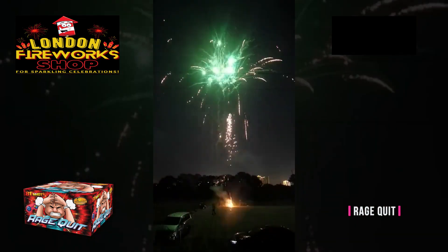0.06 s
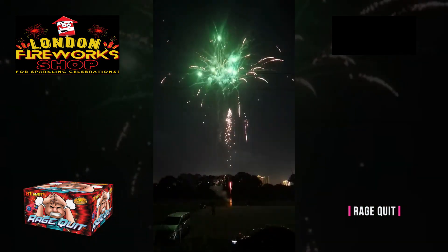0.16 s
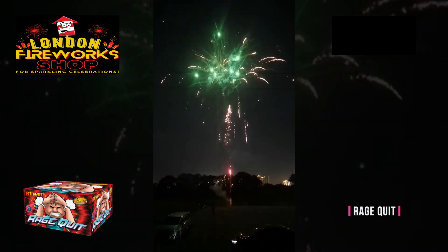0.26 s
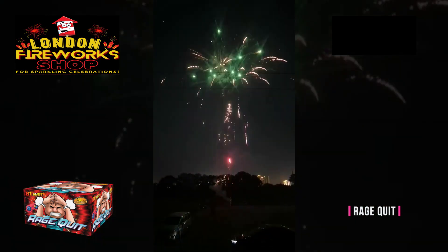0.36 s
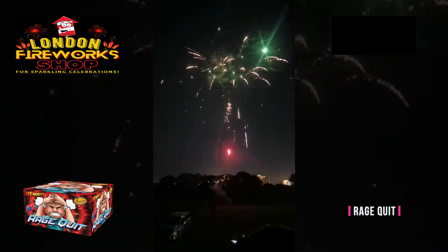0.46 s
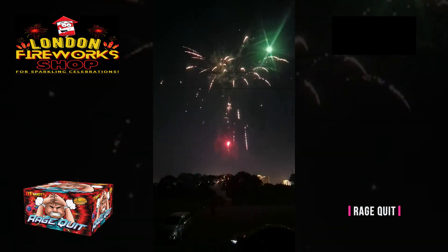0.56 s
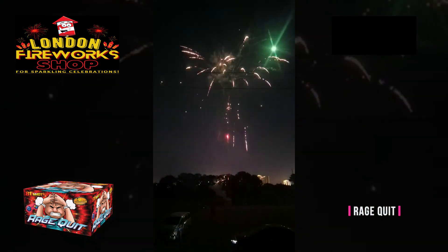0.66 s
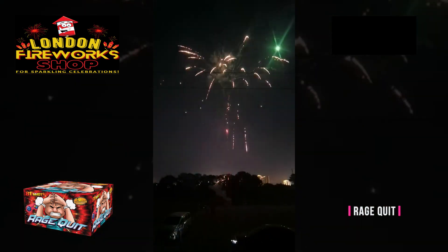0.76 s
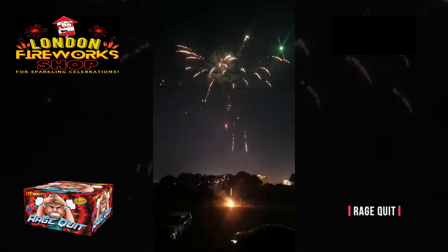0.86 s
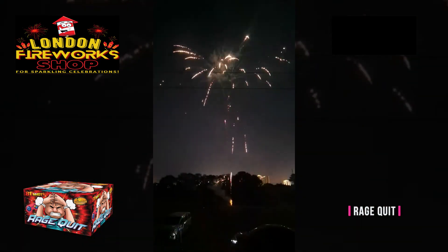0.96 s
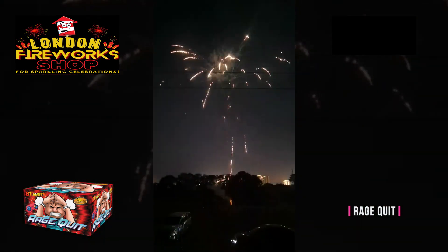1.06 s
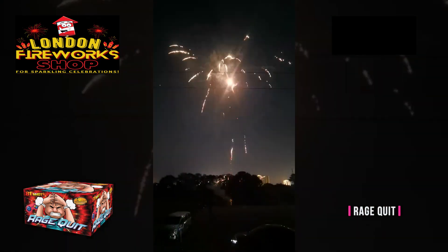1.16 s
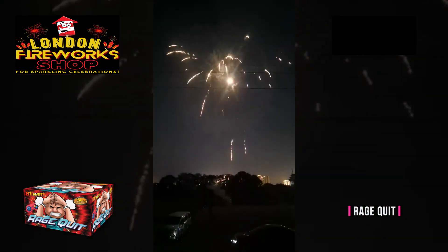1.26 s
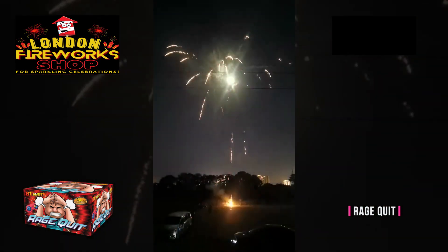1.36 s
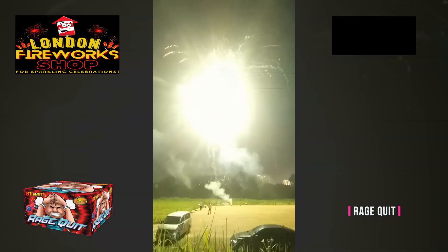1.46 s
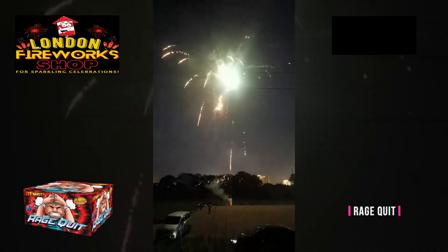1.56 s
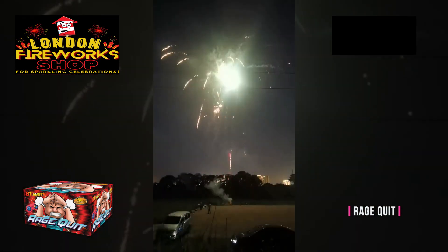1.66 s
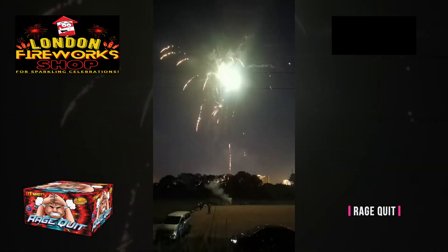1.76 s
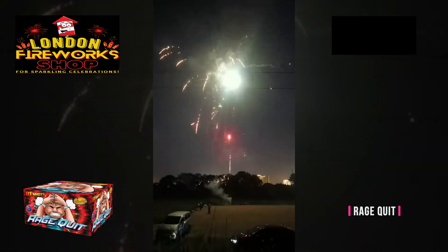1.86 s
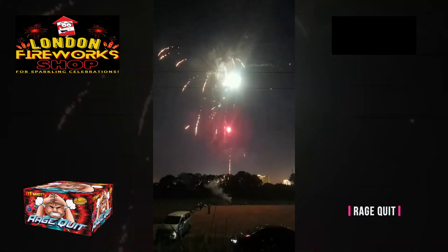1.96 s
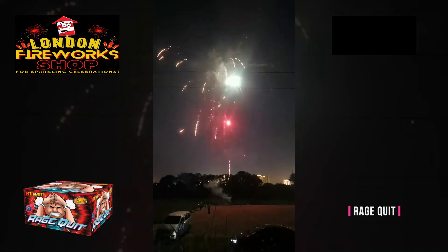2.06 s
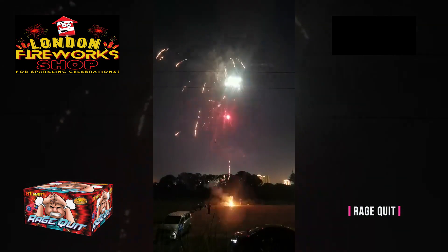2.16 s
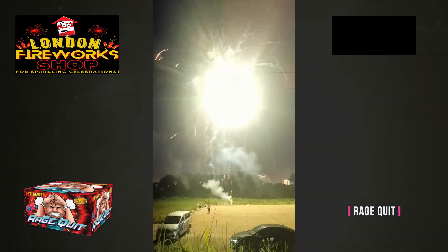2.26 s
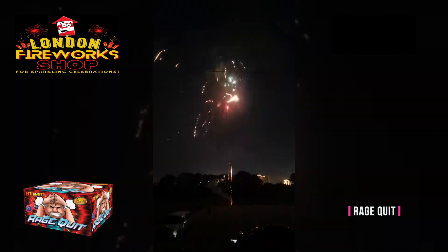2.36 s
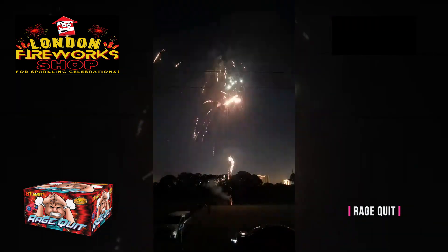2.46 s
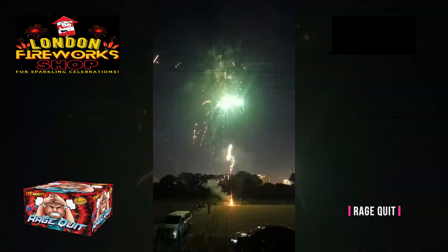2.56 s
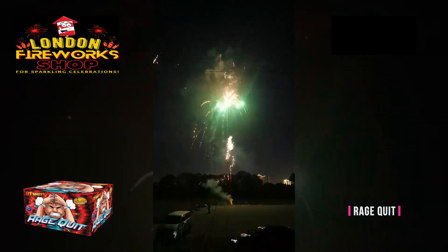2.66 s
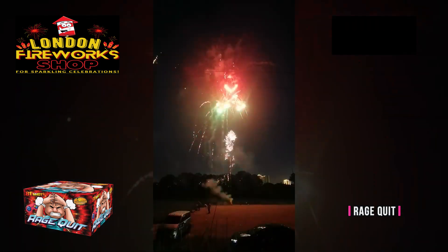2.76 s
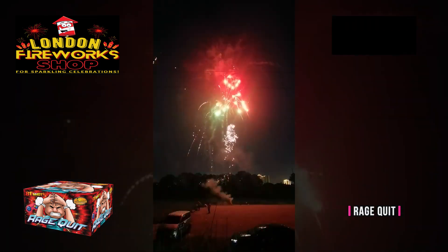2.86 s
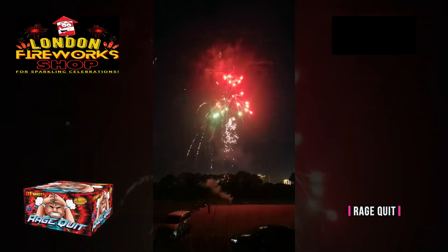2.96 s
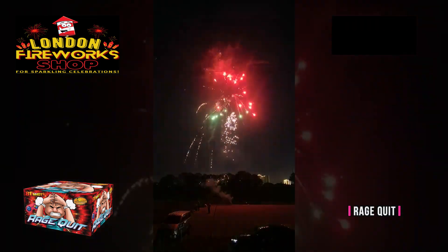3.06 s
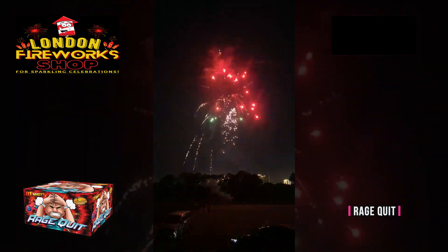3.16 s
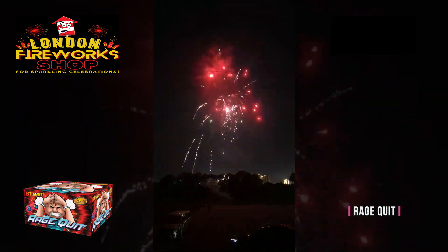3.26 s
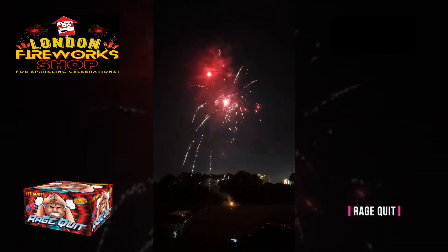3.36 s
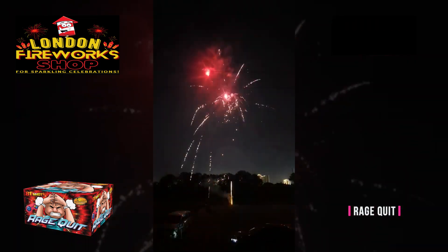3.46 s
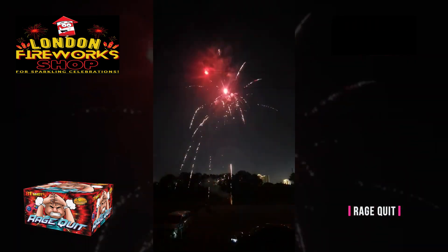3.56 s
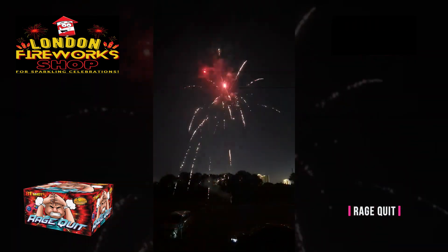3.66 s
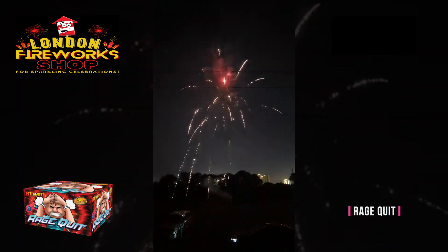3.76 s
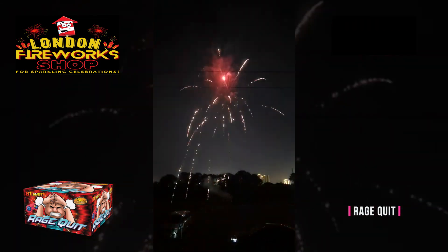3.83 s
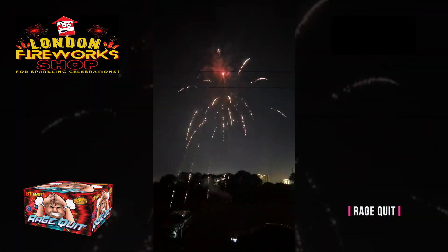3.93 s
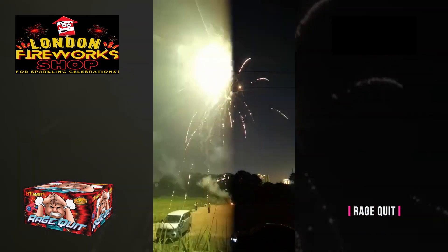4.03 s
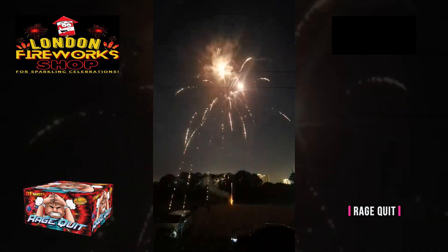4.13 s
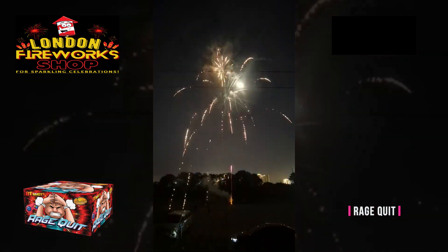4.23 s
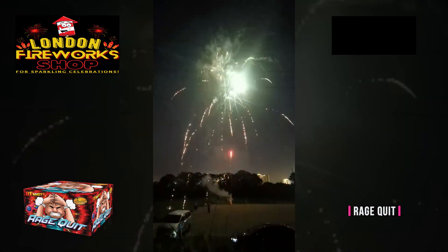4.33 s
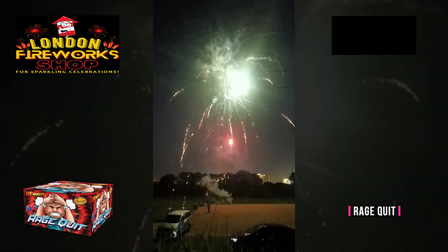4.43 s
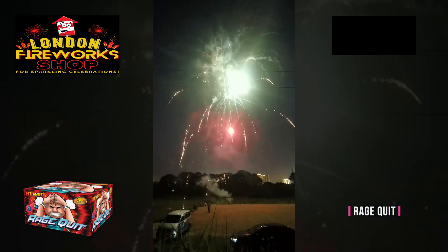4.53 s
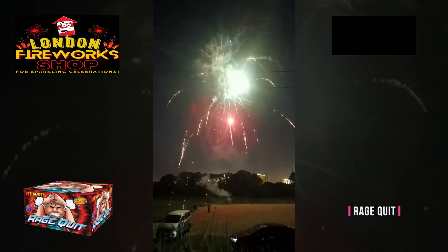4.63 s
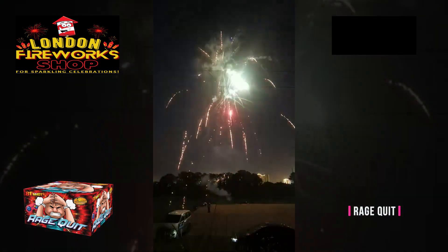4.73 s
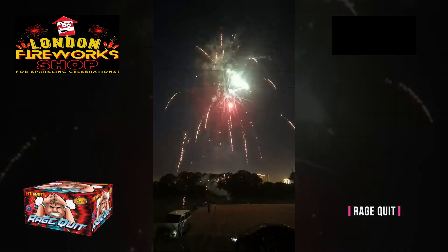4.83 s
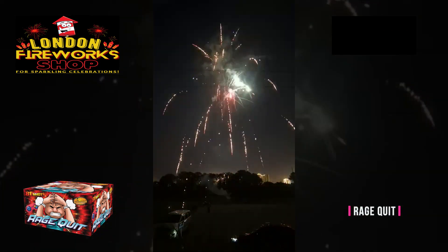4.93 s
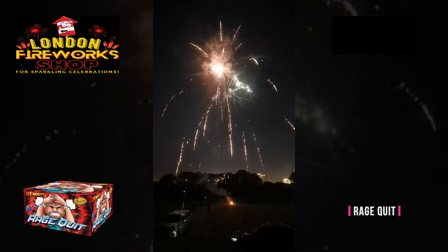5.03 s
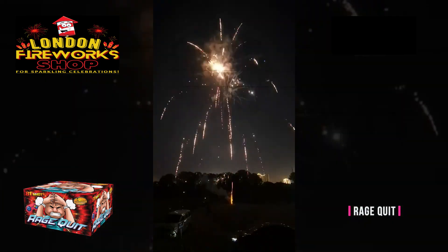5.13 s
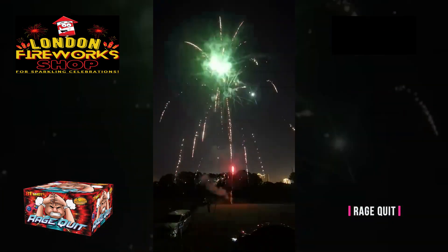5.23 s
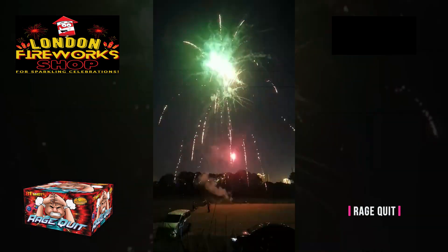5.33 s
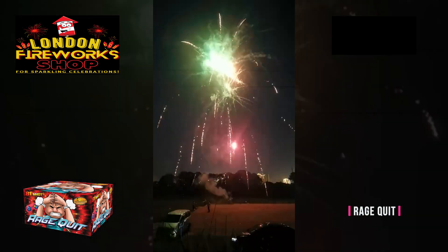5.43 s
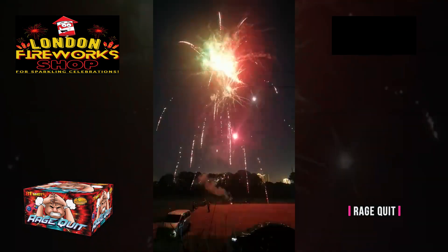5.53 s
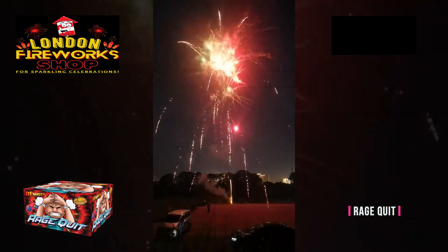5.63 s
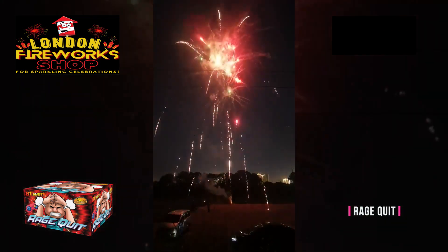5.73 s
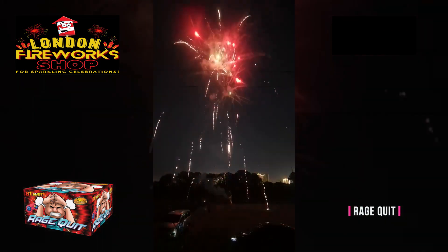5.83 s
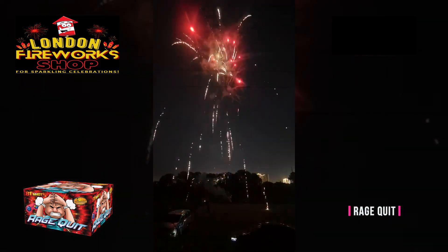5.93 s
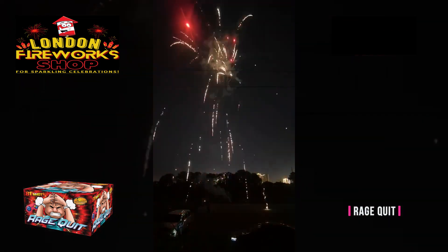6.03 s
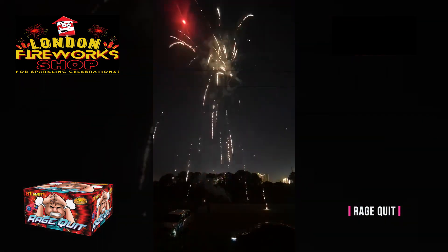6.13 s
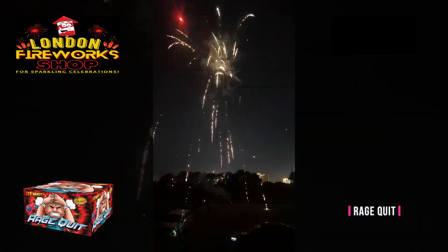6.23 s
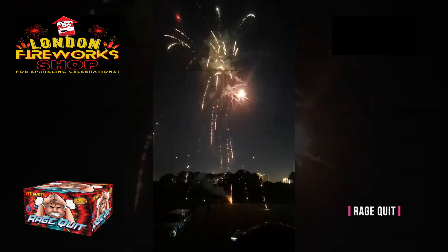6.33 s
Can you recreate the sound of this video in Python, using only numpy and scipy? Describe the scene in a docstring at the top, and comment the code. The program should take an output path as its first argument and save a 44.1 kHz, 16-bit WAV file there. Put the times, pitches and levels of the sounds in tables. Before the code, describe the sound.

A multi-shot firework fires on an open night field, heard from beside a parked car. Hard lift cracks at the ground alternate irregularly with deep overhead booms. Each burst leaves bright hiss, fine crackle and a short lumpy roll; a nearby wall and fences throw back quick slaps. The loudest peaks squash, and wide stereo hiss sits over faint rumble.

```python
"""Booms burst overhead, stars hiss and crackle after them, and lift charges crack at ground level: a firework
cake on an open field at night, heard from beside a parked car. Bangs are pressure pulses plus short treble
bursts; stars, comets and rolling echoes are shaped stereo noise. The ground, the car, a near wall, fences
and a far row of houses answer with delayed copies, over a distant rumble and thin hiss.
The loudest peaks are squashed at full scale."""
import sys
import numpy as np
from scipy import signal
from scipy.fft import rfft, irfft, next_fast_len
from scipy.io import wavfile
from scipy.ndimage import uniform_filter1d, map_coordinates

SR = 44100
rng = np.random.default_rng(int(sys.argv[2]) if len(sys.argv) > 2 else 0)


def waveform_to_disk(signal):
    """Save audio, clipped to [-1, 1], as 16-bit WAV at the path in sys.argv[1]."""
    frames = np.transpose(np.atleast_2d(signal))
    scaled = np.clip(frames, -1, 1) * 32767
    samples = np.round(scaled).astype(np.int16)
    wavfile.write(sys.argv[1], SR, samples)


N = 281799
T = np.arange(SR) / SR  # one second of time, s
LIFT_WALL_S = .0341  # delay of the near wall's answer to a sound at ground level

# tone colour of burning stars, relative: (f/Hz, level/dB)
STAR_COLOUR = [(880, -13), (1500, -8.5), (2190, -8.5), (3730, -7), (6310, 3), (8320, 3.5), (10600, -8),
               (11900, -13.5), (14800, -11), (16000, -45)]
# tone colour of the echoes rolling after a boom, relative: (f/Hz, level/dB)
BOOM_ROLL_COLOUR = [(18, -51), (30, 25), (96, -8), (206, 3.5), (237, -2.5), (762, -5), (1060, -14.5),
                    (1730, -14.5), (2250, -13), (4000, -19.5), (5200, -81), (8800, -120)]
# time the boom's roll takes to fall 60 dB: (f/Hz, t60/s)
BOOM_ROLL_T60 = [(60, 0.96), (300, 0.9), (1000, 0.88), (4000, 0.64)]
# fence echoes, level before each bang's own: (delay/ms, level/dB, ring f/Hz, time to ring peak/ms)
FENCE_ECHOES = [(129, -41, 1160, 0.39), (198.6, -27.5, 2230, 0.88), (215, -37, 550, 0.73),
                (287, -27.5, 2750, 0.25), (486.5, -47, 2250, 0.53), (753, -43, 2400, .3)]


def amp(db):
    """dB to gain."""
    return 10 ** (np.asarray(db) / 20)


def along(points, hz):
    """Reads a curve of (f/Hz, value) points at hz, interpolating on a log frequency axis."""
    f, v = np.transpose(points)
    return np.interp(np.log(hz + 1), np.log(f + 1), v)


def add(out, x, s):
    """Mixes x into out from second s on."""
    part = out[:, round(s * SR):][:, :x.shape[-1]]
    part += x[..., :part.shape[1]]


def rush(spectrum, n, patchy_db, t60=None):
    """Patchy stereo noise, rms about 1 at its start; with t60 each frequency dies at its own speed."""
    # likeness of left and right, 1 = identical: (f/Hz, likeness)
    likeness = [(60, .985), (400, 0.99), (700, 0.9), (1300, 0.86), (2400, 0.32), (4400, 0.016),
                (15000, .02)]
    hz, t, z = signal.stft(rng.standard_normal((2, n)), SR, nperseg=512)

    # smooth random patches across frequency, then time
    field = uniform_filter1d(rng.standard_normal(z.shape[1:]), size=5, axis=0)
    field = uniform_filter1d(field, size=3, axis=1)

    gain = amp(along(spectrum, hz))[:, None]
    gain = gain / np.sqrt(np.mean(gain ** 2))
    gain = gain * amp(patchy_db * field / field.std())
    if t60:
        gain = gain * amp(-60 * t / along(t60, hz)[:, None])

    # less likeness turns more of the power into side signal
    turn = np.arccos(np.clip(along(likeness, hz), 0, 1))[:, None] / 2
    mid, side = np.cos(turn) * z[0], np.sin(turn) * z[1]
    stereo = np.array([mid + side, mid - side]) * gain
    return signal.istft(stereo, SR, nperseg=512)[1][:, :n]


def night():
    """The field's distant rumble and thin hiss, slowly drifting, with an earlier shell's stars dying away."""
    # background tone colour, relative: (f/Hz, level/dB)
    colour = [(18, -24), (30, -17), (80, 16), (92, -4.5), (321, 4.5), (599, -7), (676, -0.5), (1090, -15),
              (1490, -10.5), (1600, -13.5), (3700, -24), (4820, -15.5), (7070, -22), (7970, -9),
              (9200, -20.5), (12000, -126), (20200, -120)]
    # background level over time: (t/s, level/dB)
    level = [(0, -45), (.5, -50.5), (1.401, -48.5), (2.3, -52.5), (3.299, -47), (4.199, -48.5),
             (4.998, -51), (6.39, -50)]
    s, db = np.transpose(level)
    out = amp(np.interp(np.arange(N) / SR, s, db)) * rush(colour, N, patchy_db=3)
    earlier_db, earlier_t60 = -31.5, .7  # start level, seconds to fall 60 dB
    add(out, amp(earlier_db - 60 * T / earlier_t60) * rush(STAR_COLOUR, SR, patchy_db=0), 0)
    return out


def crack(ms):
    """The shock's treble, scattered around the microphone ports and decaying by 1/e in ms milliseconds."""
    # tone colour of the crack, relative: (f/Hz, level/dB)
    colour = [(880, -2.5), (1500, -20.5), (2190, 1.5), (2690, -11.5), (3220, -7.5), (4730, -7.5), (6760, 1),
              (9650, -7.5), (11000, -23.5), (16000, -31)]
    n = SR // 20
    envelope = np.roll(np.exp(-T[:n] * 1000 / ms), 44)  # starts 1 ms in
    z = rfft(rng.standard_normal((2, n)) * envelope, axis=1)
    gain = amp(along(colour, np.fft.rfftfreq(n, 1 / SR)))
    return irfft(z * gain / np.sqrt(np.mean(gain ** 2)), n) * amp([[-1.5], [1.5]])  # right is louder


def blast(hz, front, front_ms, cycles, lag_ms):
    """A pressure front, then the gas ball overshoots: suction and rebound. The left port hears it lag_ms late."""
    t = T[:SR // 20] - .0003 - np.array([[lag_ms], [-lag_ms]]) / 2000  # starts about 0.3 ms in
    t = np.maximum(t, 0)
    push = front * np.sin(np.pi * np.minimum(t / front_ms * 1000, 1))
    late = np.maximum(t - front_ms / 1000, 0)
    suction = np.sin(2 * np.pi * hz * late) * np.exp(-late * hz / cycles)
    return push - suction


def slaps(pulse, span, t60, count):
    """Single slaps of a pulse off trunks, cars and sheds, at random delays within span s, sizes and sides."""
    when, size, side = rng.random((count, 3)).T
    at = (when * span * SR).astype(int)
    fall_db = -60 * when * span / t60
    size_db = -1.8 * np.log(size + 0.063)
    side_db = np.outer([1, -1], 3 * side - 1.5)
    gain = amp(fall_db + size_db) * amp(side_db)
    train = np.array([np.bincount(at, g, SR // 2) for g in gain])
    return signal.fftconvolve(train, pulse, axes=1)


def hiss(burn, rise, fade, end, dull_db):
    """Stars swell, fade (fade scales their decay times) and drop to an afterglow; dull_db per kHz is distance."""
    # time star hiss takes to fall 60 dB, before fade: (f/Hz, t60/s)
    star_t60 = [(2000, 2.14), (8000, 1.18), (10500, 1.07), (13000, 0.44)]
    burning = 1 / (1 + np.exp(np.clip((T - burn) / end, -50, 50)))
    glow = (1 - np.exp(-T / rise)) * (burning + amp(-10))
    colour = [(hz, db - dull_db * hz / 1000) for hz, db in STAR_COLOUR]
    decay = [(hz, fade * t60) for hz, t60 in star_t60]
    return glow * rush(colour, SR, patchy_db=3, t60=decay)


def roll(spectrum, t60, rise):
    """Echoes from trees and houses all round, arriving in lumps."""
    knots = rng.standard_normal(SR // 200 + 4)  # one every 200 samples
    lumps = amp(3.8 * map_coordinates(knots, [np.arange(SR) / 200]))
    return (1 - np.exp(-T / rise)) * lumps * rush(spectrum, SR, patchy_db=3, t60=t60)


def thud():
    """A boom rounded off by a long way: a weak, slow front before the suction."""
    return blast(hz=302, front=0.1, front_ms=0.98, cycles=0.51, lag_ms=.05)


def shells():
    """Each shell: boom, ground, car and wall bounces, stars, roll and fence echoes."""
    # bursts, levels before each layer's trim; height runs from 0 low to 1 high and may pass below 0:
    # (t/s, boom level/dB, roll level/dB, star burn/s, height)
    bursts = [(.067, -3, -18.5, 0.32, 0.99), (1.7833, -2, -18.5, 0.32, -.15),
              (2.5581, -2.5, -19.5, 0.46, .09), (2.8484, -1, -22.5, 0.24, -0.052),
              (4.3582, -2.5, -19.5, 0.37, 0.96), (5.321, -2.5, -21, 0.68, 0.87),
              (5.6179, -2, -24, 0.14, 0.89)]
    # echo delays by height: ground, car, wall, in ms
    low_ms, high_ms = np.array([4.25, 12.5, 33.7]), np.array([4.9, 16.4, 31.5])
    wall_low_db, wall_high_db = 6, 1.5  # the wall faces low bursts more squarely
    stars_db = -26.5
    out = np.zeros((2, N))
    for s, db, roll_db, burn, height in bursts:
        ground, car, wall = s + (low_ms + height * (high_ms - low_ms)) / 1000
        wall_db = wall_low_db + height * (wall_high_db - wall_low_db)

        # direct boom
        add(out, amp(db - 2) * crack(ms=1.9), s - .001)
        add(out, amp(db - 1) * crack(ms=0.56), s + 0.00071)  # the casing's second snap
        add(out, amp(db + 5) * blast(hz=225, front=.2, front_ms=.25, cycles=.65, lag_ms=-.2), s)
        # the blast shoves the left port more: a slow lopsided thump
        thump = -blast(hz=57.4, front=0, front_ms=0.73, cycles=0.58, lag_ms=0)
        add(out, amp(db + np.array([[-5], [-35]])) * thump, s)

        # ground and car
        add(out, amp(db + 3.5) * blast(hz=330, front=.35, front_ms=.4, cycles=.42, lag_ms=-.15), ground)
        add(out, amp(db - 1.5) * blast(hz=230, front=.3, front_ms=.25, cycles=.45, lag_ms=-.1), car)
        add(out, amp(db - 25) * crack(ms=2.3), car)

        # wall, loose slaps, then wall and car together
        knock = blast(hz=400, front=.75, front_ms=.4, cycles=.36, lag_ms=.12)
        add(out, amp(wall_db - 3.7) * (knock + amp(-25) * crack(ms=0.99)), wall)
        add(out, amp(roll_db - 1) * slaps(knock, span=.45, t60=0.4, count=60), wall)
        double = blast(hz=330, front=.15, front_ms=.4, cycles=.35, lag_ms=.12)
        add(out, amp(wall_db - 8) * double, wall + car - s)

        add(out, amp(stars_db) * hiss(burn, rise=0.0019, fade=1.055, end=0.023, dull_db=0), s)
        crackle = slaps(crack(ms=0.35), span=.4, t60=1.47, count=90)
        add(out, amp(stars_db - 3.5) * crackle, s)
        add(out, amp(roll_db) * roll(BOOM_ROLL_COLOUR, BOOM_ROLL_T60, rise=0.0062), s)
        for fence_ms, *_ in FENCE_ECHOES[:2]:
            add(out, amp(db - 17) * (thud() + amp(-17) * crack(ms=7.6)), s + fence_ms / 1000)
    return out


def lifts():
    """Each lift: crack, ground and car bounces, round wall echo, thin fence echoes, rising comet and roll."""
    # lift charges, levels before each layer's trim:
    # (t/s, crack level/dB, wall echo level/dB, comet hiss level/dB)
    charges = [(0.3328, -0.5, -0.5, -25.5), (1.0900, 0, 0.5, -20.5), (1.6165, -5, -3.5, -16.5),
               (2.4218, -3, -1.5, -20), (2.7978, -0.5, -2, -17.5), (3.6544, -1.5, -0.5, -17.5),
               (4.3242, -4, -18, -19), (5.349, -2.5, -7, -19.5), (5.8523, 2, -5, -16)]
    # tone colour of the lift's roll, relative: (f/Hz, level/dB)
    roll_colour = [(24, -34), (40, -18), (119, 9), (227, 2.5), (302, 9), (510, -4.5), (749, -2.5),
                   (1140, -6.5), (1710, -8.5), (5000, -26), (6500, -12), (11000, -120)]
    # time the lift's roll takes to fall 60 dB: (f/Hz, t60/s)
    roll_t60 = [(60, 0.64), (300, 0.56), (1000, 0.79), (4000, 1)]
    wall_roll_t60 = [(500, 0.055), (2500, 0.14)]  # short burst of roll at the wall: (f/Hz, t60/s)
    car_s, shed_s = .0095, .0418  # echo delays
    out = np.zeros((2, N))
    for s, db, wall_db, hiss_db in charges:
        wall = s + LIFT_WALL_S

        # direct crack and ground bounce
        add(out, amp(db - 5.5) * crack(ms=2.02), s - .0012)
        add(out, amp(db - 3) * blast(hz=480, front=1, front_ms=.2, cycles=.22, lag_ms=-.06), s - .0003)
        bounce = blast(hz=750, front=1.1, front_ms=.2, cycles=.3, lag_ms=.06)
        add(out, amp(db - 8) * bounce * amp([[-2.5], [1.5]]), s + .0009)

        # car
        panel = blast(hz=800, front=0.38, front_ms=0.28, cycles=2.2, lag_ms=-0.11)
        add(out, amp(db - 21.5) * (panel + amp(-9) * crack(ms=2.2)), s + car_s)

        # wall: round knock, bright ring, loose slaps and treble
        knock = blast(hz=520, front=1.15, front_ms=.36, cycles=.3, lag_ms=.06)
        add(out, amp(wall_db - 1) * knock, wall - .0003)
        ping = blast(hz=2260, front=0.32, front_ms=0.18, cycles=3.1, lag_ms=.06)
        add(out, amp(wall_db - 20) * ping, wall)
        add(out, amp(wall_db - 25) * slaps(knock, span=0.18, t60=0.53, count=40), wall)
        add(out, amp(wall_db - 17.5) * crack(ms=1.5), wall - .001)

        shed = blast(hz=633, front=0.18, front_ms=0.15, cycles=0.46, lag_ms=0.1)
        add(out, amp(wall_db - 16.5) * shed, s + shed_s)

        for ms, echo_db, echo_hz, ring_ms in FENCE_ECHOES:
            u = T[:400] * 1000 / ring_ms
            ring = np.sin(2 * np.pi * echo_hz * T[:400]) * u * np.exp(1 - u)
            add(out, amp(db + echo_db) * (ring + 0.2 * crack(ms=3.9)[:, :400]), s + ms / 1000)

        comet = hiss(burn=0.037, rise=0.042, fade=0.37, end=0.0057, dull_db=0)
        add(out, amp(hiss_db) * comet, s)
        add(out, amp(-35) * roll(roll_colour, roll_t60, rise=0.0017), s)
        add(out, amp(-37.5) * roll(roll_colour, roll_t60, rise=0.0017), wall)
        add(out, amp(-19) * roll(roll_colour, wall_roll_t60, rise=0.00033), wall)
    return out


def far_houses():
    """The boom comes back faintly, the near wall repeats it, dull roll and stars follow."""
    # shells heard again off the far houses, where no nearer bang covers them: (t/s, level/dB)
    answers = [(0.8961, -20), (3.4038, -23.5), (5.1964, -18), (6.149, -26)]
    out = np.zeros((2, N))
    for s, db in answers:
        add(out, amp(db) * thud(), s)
        add(out, amp(db - 4) * thud(), s + LIFT_WALL_S)
        add(out, amp(db - 14.5) * roll(BOOM_ROLL_COLOUR, BOOM_ROLL_T60, rise=0.087), s)
        add(out, amp(db - 22) * hiss(burn=.4, rise=.1, fade=.9, end=.05, dull_db=2.3), s)
    return out


def scene():
    """Everything on the field."""
    return night() + shells() + lifts() + far_houses()


def record(dry):
    """The microphones lose deep bass, peaks squash at full scale, nothing is kept above the band limit."""
    bass_hz, top_hz = 30.3, 16200
    m = next_fast_len(N + 8192)
    hz = np.fft.rfftfreq(m, 1 / SR)
    bass_cut = (1j * hz / (1j * hz + bass_hz)) ** 2  # two first-order high-passes
    x = irfft(rfft(dry, m) * bass_cut, m)
    x = x / (1 + np.abs(x) ** 6) ** (1 / 6)  # clipping with a rounded knee
    band = np.clip((top_hz - hz) / 500 + .5, 0, 1)  # 500 Hz wide slope
    x = irfft(rfft(x) * band, m)[:, :N]
    return np.clip(x, -1, 1)


dry = scene()
out = record(dry)
waveform_to_disk(out)
```